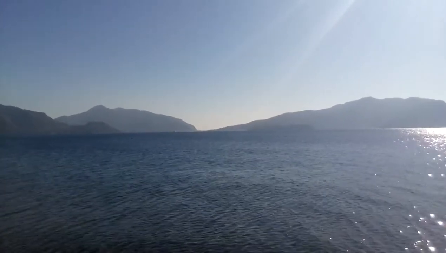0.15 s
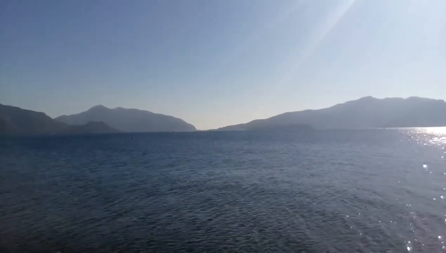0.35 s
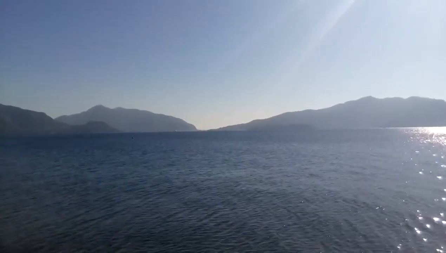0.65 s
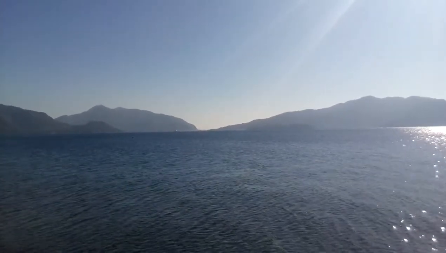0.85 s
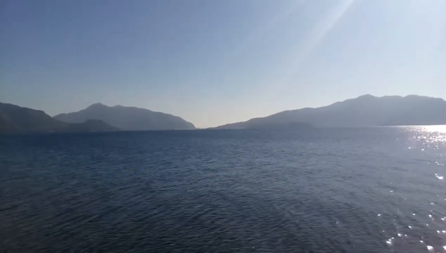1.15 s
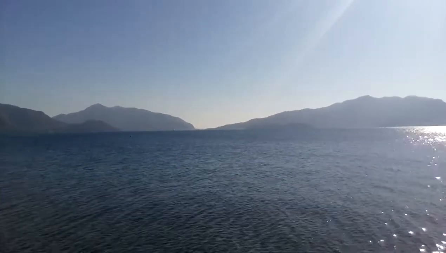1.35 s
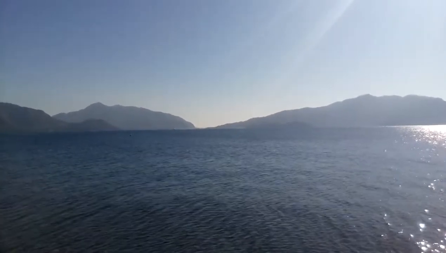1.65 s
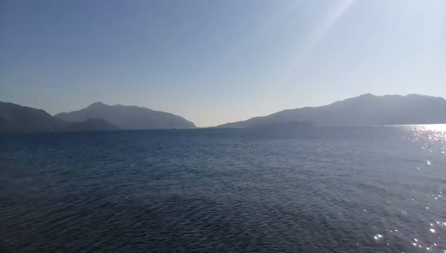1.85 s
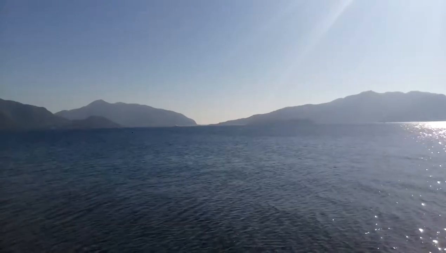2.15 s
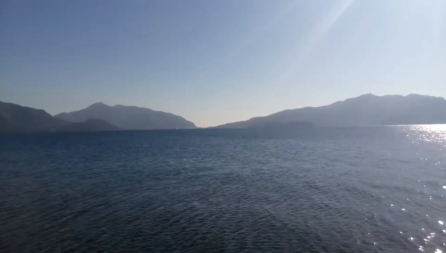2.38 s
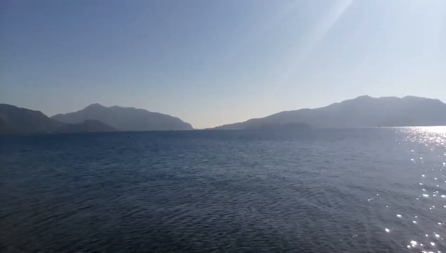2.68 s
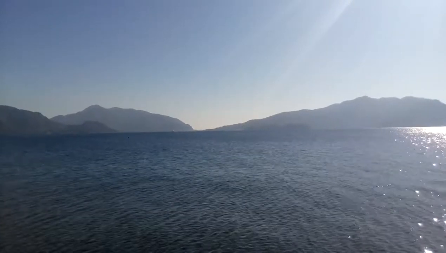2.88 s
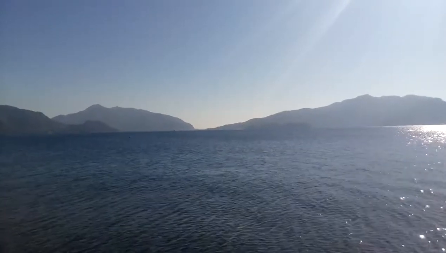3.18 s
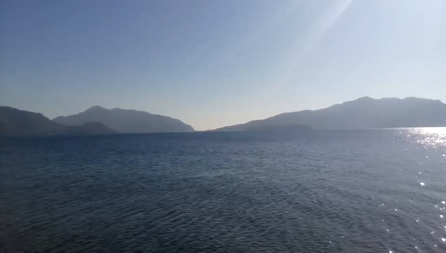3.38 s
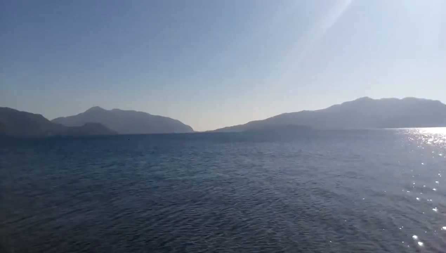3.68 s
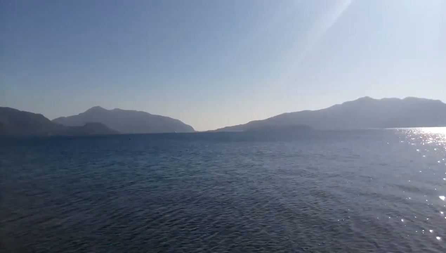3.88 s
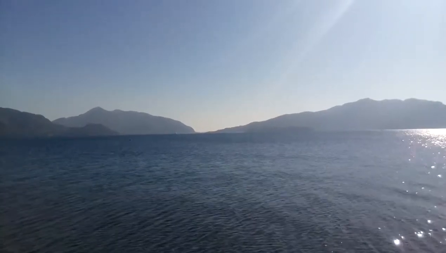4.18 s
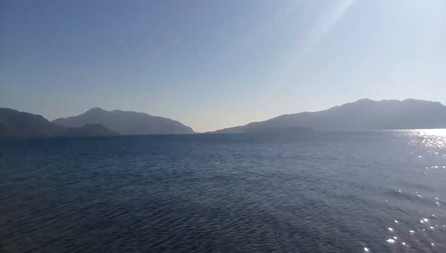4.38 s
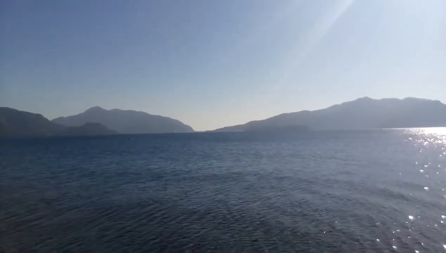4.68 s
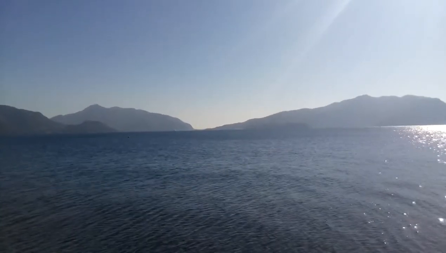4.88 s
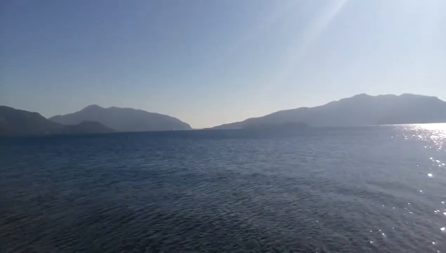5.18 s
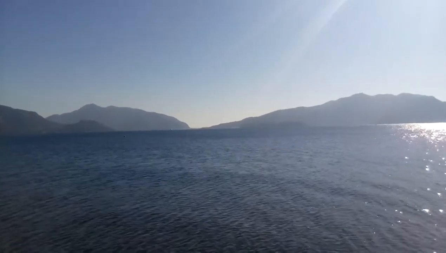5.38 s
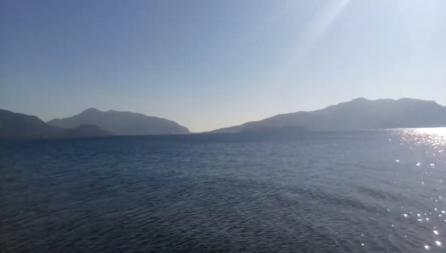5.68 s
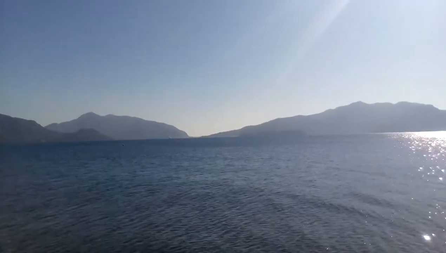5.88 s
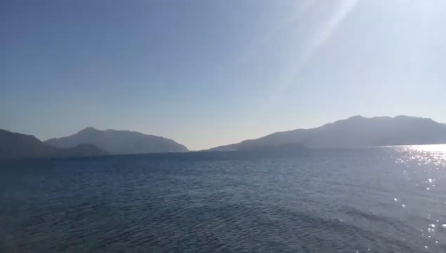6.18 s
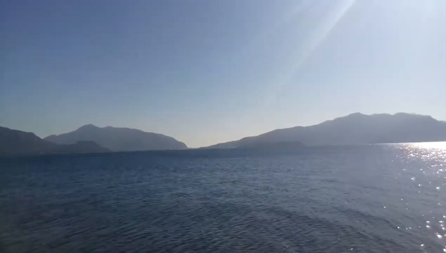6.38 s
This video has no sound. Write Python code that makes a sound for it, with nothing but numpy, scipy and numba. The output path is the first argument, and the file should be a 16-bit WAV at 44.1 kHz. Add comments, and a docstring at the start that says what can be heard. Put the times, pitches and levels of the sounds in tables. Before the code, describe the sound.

Gentle water swells twice with bubbling and drips over faint breeze thumps, before hard handling clicks break in close at the end.

```python
"""Small waves lap a pebbly shore in a calm bay: swarms of ringing air bubbles over filtered-noise washes.
Far water and a light breeze sound from the start; eddies thump the microphone as short rounded pulses.
Drops, lone bubbles and gargles join as decaying sines; two small waves swell near 2 s and again after 4 s.
Faint gliding sines chirp near 4 s and after 5.9 s. From 5.8 s the hand-held recorder is gripped anew:
its case clicks sharply as struck damped modes, and a finger rubs across it as shaped noise."""
import sys
import numpy as np
from scipy import signal
from scipy.fft import rfft, irfft, next_fast_len
from scipy.io import wavfile
from scipy.ndimage import uniform_filter1d
from numba import njit

SR = 44100
rng = np.random.default_rng(int(sys.argv[2]) if len(sys.argv) > 2 else 0)


def master_out(mix):
    """Clip the mix to full scale and print it as 16-bit PCM to the path in sys.argv[1]."""
    frames = np.transpose(np.atleast_2d(mix))
    ceiling = np.clip(frames, -1, 1)
    pcm = np.round(ceiling * 32767).astype(np.int16)
    wavfile.write(sys.argv[1], SR, pcm)


N = 288281

# times at which the slow controls are computed
STEPS_S = np.arange(0, N / SR + .004, .004)

# spectral density of breaking water: frequency_hz, density_db
WATER_SPECTRUM = [(250, -15.5), (420, -2), (560, -4), (800, -4), (1130, -1.5), (1500, -5.5), (2000, -7.5),
                  (3000, -12), (4100, -14), (5000, -16), (5750, -17), (6800, -23.5), (8200, -35),
                  (11500, -41.5), (15500, -79)]
# laps, where a stretch of a wave tips over on the shore: crest_s, level_db, swell_s, ebb_s,
# deep_air_pockets_db, big_bubbles_db, small_bubbles_db (weights added to the level),
# bounce_strength (0-1), bounce_extra_path_m (at the crest)
LAPS = [(0.14, -67.5, 0.084, 0.65, -9, -9, -2.5, 0.08, 0.3),
        (0.86, -62.5, 0.3, 0.55, 11, 3, 1.5, 0.44, 0.45), (1.05, -56, 0.22, 0.26, -4, -0.5, -3, 0.1, 0.44),
        (1.3, -53.5, 0.55, 0.45, -16, -5, 0.5, 0.18, 0.45), (1.5, -51, 0.26, 0.52, -1.5, 7, -1, 0.27, 0.44),
        (1.73, -48.5, 0.21, 0.66, 3, 6.5, -2.5, 0.36, 0.41),
        (1.92, -52.5, 0.055, 0.044, 7, 13.5, 3.5, 0.25, 0.37),
        (2.1, -39.5, 0.41, 0.39, 2, 2.5, -4.5, 0.12, 0.33), (2.29, -43.5, 0.24, 0.18, 0, -3.5, -11, 0, 0.3),
        (2.49, -51, 0.23, 0.29, -16, -5.5, -6.5, 0.13, 0.36),
        (2.84, -58, 0.29, 0.43, -3, -4.5, -6, 0.35, 0.34), (3.332, -64, 0.18, 0.13, -5, -11, 0, 0.1, 0.44),
        (3.65, -57.5, 0.25, 0.18, 2, -5, -1.5, 0.22, 0.25),
        (3.78, -58.5, 0.11, 0.25, -4, -0.5, -1, 0.25, 0.49),
        (4.01, -66.5, 0.15, 0.46, -7, -9, 1.5, 0.16, 0.41),
        (4.171, -57.5, 0.028, 0.05, -19, -15, -4, 0.25, 0.44),
        (4.325, -86, 0.021, 0.06, -7, 11, 2, 0.4, 0.38),
        (4.367, -46, 0.02, 0.041, -15, -18, -3.5, 0.5, 0.437),
        (4.53, -47.5, 0.3, 0.29, 4, 3, 1.5, 0.44, 0.43), (4.82, -54, 0.58, 0.33, -3, 1.5, -5.5, 0.33, 0.37),
        (4.825, -56.5, 0.06, 0.083, 20, 10.5, -12, 0.45, 0.37),
        (4.98, -50, 0.42, 0.36, 5.5, 7.5, -7, 0.2, 0.36),
        (5.08, -55.5, 0.041, 0.069, 19.5, 14.5, -9, 0.2, 0.33),
        (5.17, -51.5, 0.13, 0.3, -2, 2, -18, 0.4, 0.33), (5.29, -53, 0.14, 0.52, -3, -5, -7, 0.18, 0.32),
        (5.44, -60.5, 0.072, 0.056, 8, 10.5, -9, 0.3, 0.35)]
# level lost one swell before or one ebb after a crest, and the power law of that loss
LAP_FALL_DB, CREST_ROUNDNESS = 20, 1.41
RIPPLE_DB = -73.5   # ripples between the laps, before the offset of each bubble size
# flicks of fine spray thrown off a crest: crest_s, level_db
SPRAY_FLICKS = [(1.095, -71), (1.215, -74), (1.45, -67), (1.7, -61), (2.005, -50), (2.12, -54.5),
                (4.2, -68), (4.354, -57)]
FLICK_RISE_S, FLICK_FALL_S = 0.015, 0.042
CROWDED_SHARE = 0.73   # near this share of the highest crest, bubbles merge into a smooth rush
CLOSING_M_PER_S = 0.029   # the path of the bounce shrinks as a lap runs in
# resonant peaks and dips of the shore and of the hand round the recorder: centre_hz, gain_db
SHORE_BANDS = [(1170, 1), (1430, -3.5), (1790, 1), (2170, -1), (2760, 1.5), (3050, -1.5), (3690, -1.5),
               (4040, 0.5), (4540, -2), (5170, 0.5), (5400, -2), (5720, 2.5), (6220, -3), (6800, 1)]
SHORE_WIDTH_HZ = 185
# spectral density of far water all round the bay: frequency_hz, density_db
BAY_SPECTRUM = [(150, -46), (250, -10.5), (458, -2), (1010, -3.5), (1360, -7), (1560, -7), (2240, -12.5),
                (5600, -13.5), (6770, -24), (15500, -36)]
BAY_DB = -65
# spectral density of the breeze rumble: frequency_hz, density_db
BREEZE_SPECTRUM = [(12, -43), (20, 0), (27, -7.5), (78, 4.5), (96, 6.5), (150, -2.5), (184, -3), (222, -6),
                   (400, -14.5), (520, -52), (880, -120)]
BREEZE_FLOOR_DB = -73
# gusts of the breeze on the microphone: crest_s, level_db, swell_s, ebb_s
GUSTS = [(.035, -45, 0.13, 0.095), (.42, -57, 0.87, 0.27), (.645, -45.5, 0.11, 0.14),
         (.8, -41.5, 0.14, 0.19), (.96, -43.5, 0.13, 0.12), (1.13, -52.5, 0.089, .13),
         (1.55, -53, 0.35, 0.83), (2.0, -55.5, 0.85, 2.5), (3.4, -62, 0.98, 1.2), (4.38, -53.5, 0.49, 0.2),
         (4.83, -58, 0.22, 0.1), (5.45, -54, 0.47, 1.14), (6.199, -56.5, 0.58, 0.69)]
# single eddies that bump the microphone: centre_s, level_db, pitch_hz
EDDIES = [(.02, -33, 110), (.061, -33.5, 100), (.314, -43.5, 115), (0.406, -43.5, 120), (.441, -41, 120),
          (.641, -35.5, 117), (.75, -32, 90), (.776, -37, 290), (.792, -26.5, 205), (.805, -29, 147.6),
          (0.82, -37, 250), (.835, -36.5, 254), (.84, -26.5, 94), (.947, -31, 191), (.97, -30, 171),
          (.983, -28, 220), (1.125, -36.5, 153), (1.499, -41.5, 112), (1.754, -37.5, 172),
          (2.005, -40, 116), (2.043, -36, 221), (3.492, -38.5, 130), (3.598, -38.5, 162),
          (3.819, -43.5, 161), (5.449, -36.5, 161), (5.647, -40, 133), (6.236, -41, 109.2),
          (6.409, -42.5, 109)]
EDDY_RISE_CYCLES, EDDY_FALL_CYCLES = 0.38, 0.83
# drops that smack onto water or stone: start_s, pitch_hz, level_db
DROPS = [(.102, 2800, -49.5), (.128, 2550, -53.5), (.205, 3550, -47), (1.131, 5770, -41),
         (1.176, 4700, -37.5), (1.29, 3790, -42), (1.338, 2641, -41), (1.37, 6570, -39), (1.503, 4560, -30),
         (1.627, 2239, -36), (1.783, 4470, -33), (1.907, 4938, -39), (2.002, 5230, -33),
         (2.031, 5680, -28.5), (2.055, 5340, -34), (2.16, 5111, -37), (3.79, 5570, -43), (4.331, 2270, -39),
         (4.36, 4077, -34), (4.363, 2330, -33), (4.366, 2980, -37), (4.458, 3330, -35), (4.757, 1838, -39),
         (4.798, 2756, -38), (4.862, 2527, -38), (5.148, 2067, -37), (5.305, 3388, -45)]
DROP_T60_S = 0.013
# droplets land within this time, start this much weaker and lie within this interval of the drop
SPATTER_S, SPATTER_DB, SPATTER_OCTAVES = .012, -3.5, .22
# single near bubbles, plus one brief sharp tick at 4.204 s: start_s, pitch_hz, level_db, t60_s
PLOPS = [(.107, 3650, -53, .04), (.913, 1450, -38, 0.053), (1.047, 3020, -45, .02),
         (1.258, 2350, -36, 0.022), (1.281, 2290, -34, .014), (1.402, 1444, -36.5, 0.041),
         (1.625, 725, -32.5, 0.061), (1.661, 970, -28, .031), (1.699, 674, -30.5, 0.067),
         (1.726, 1030, -34, 0.042), (1.752, 940, -27, .04), (1.776, 1040, -30, .03), (1.792, 970, -29, .02),
         (1.821, 1020, -30, .02), (1.856, 1050, -33, 0.016), (1.871, 870, -28, .05),
         (1.885, 351, -36.5, 0.068), (1.95, 1025, -29, .025), (2.112, 1170, -29, 0.033),
         (2.16, 1000, -27, 0.027), (2.519, 1100, -43, .04), (2.687, 1635, -41, 0.06),
         (2.78, 280, -44, 0.063), (3.6, 1378, -43.5, .04), (3.679, 1470, -45, .06), (3.738, 1430, -45, .06),
         (4.164, 1450, -46.5, .06), (4.204, 5540, -32.5, .002), (4.271, 4130, -41.5, .023),
         (4.289, 4080, -42, .04), (4.308, 764, -47.5, .082), (4.328, 830, -45, 0.055),
         (4.348, 1650, -37.5, .04), (4.483, 786, -33, 0.048), (4.547, 1016, -28.5, 0.038),
         (4.584, 405, -36.5, 0.099), (4.64, 1115, -34, .043), (4.661, 316, -43.5, .11),
         (4.703, 994, -34.5, .03), (4.729, 1215, -32, .036), (4.822, 898, -34, .043),
         (4.883, 343, -33.5, 0.075), (4.906, 1100, -36, .03), (4.965, 675, -33, 0.044),
         (5.117, 1091, -34, .03), (5.213, 880, -36.5, 0.048), (5.346, 241, -38.5, 0.13)]
# gargles, where a small lap churns up bubbles of nearly one size:
# crest_s, level_db, swell_s, ebb_s, pitch_hz
GARGLES = [(.8, -60.5, 0.23, 0.21, 1520), (.88, -56, 0.062, 0.072, 3850), (2.87, -63, 0.13, 0.089, 1170),
           (3.63, -54.5, 0.074, .14, 1410), (3.75, -56, 0.12, .22, 1520), (3.72, -61, 0.17, .12, 2480),
           (3.73, -59.5, 0.11, 0.11, 5030), (3.79, -67, 0.16, 0.13, 5500), (4.8, -57.5, 0.21, .26, 4100),
           (4.92, -55, .16, .3, 1910), (5.05, -62, .07, .08, 6750), (5.2, -59, 0.035, .05, 4480),
           (5.305, -55.5, 0.029, 0.032, 3900), (5.62, -58.5, 0.076, .1, 1200)]
# faint thin chirps: start_s, length_s, first_pitch_hz, last_pitch_hz, level_db (before a 2 dB lift)
CHIRPS = [(3.908, 0.21, 5790, 5700, -63), (4, 0.017, 3200, 3260, -55), (4.02, 0.068, 3270, 3150, -60.5),
          (5.91, 0.019, 3020, 2950, -56.5), (6.471, 0.054, 3430, 3660, -61),
          (6.497, 0.043, 3450, 3100, -63)]
# clicks of the case: start_s, strength_db, deep_thump_db, knock_db, thud_db, high_snap_db, top_tick_db
# (the last five are weights of the registers)
CLICKS = [(5.825, -12.5, 12, -18, -2, -16, 4), (5.8283, -2.5, 9, -17, -13, -6, 2),
          (5.8358, -5, 11.5, -15, -4, -5, 6), (5.839, -11, -0.5, -15, -15, -21, 1.5),
          (5.8427, -6, 9, 12, 14, 13.5, 6), (5.8552, -29.5, 12, 23, 7, -2, -20),
          (5.865, -25.5, 4, 12, 8, 9, -20), (5.881, -28, 8, 10, 12, 3, -20),
          (5.898, -33, 6, 10, 12, 0, -20), (5.915, -38, 10, 24, 10, -4, -20),
          (6.0128, -25.5, -7, 35.5, 18, -14, -8), (6.0147, 0.5, -22, 3, 6, 3.5, -16),
          (6.0838, -9.5, -15, -16, -16, -4, -16), (6.151, -25, -9, -1, 16, -11, -14)]
# modes of the case: frequency_hz, level_db, t60_s
CASE_MODES = [(325, -22.5, 0.029), (592, -20.5, 0.016), (1160, -21, 0.0099), (1470, -11.5, 0.005),
              (3380, -3, 0.0021), (5560, -7.5, 0.0017), (10400, -11, 0.00036), (13900, -14, 0.00091)]
# borders between the registers of the case: frequency_hz
REGISTER_EDGES_HZ = [400, 800, 2200, 4500, 8000]
# spectral density of the rubbing hiss: frequency_hz, density_db
RUB_SPECTRUM = [(150, -31), (380, -20), (580, -0.5), (950, -3), (1600, 3), (2000, -3.5), (2450, -13.5),
                (3400, -5), (4800, -9), (5650, -6.5), (7200, -12), (8300, -27.5), (11300, -22),
                (12300, -30), (15500, -38)]
# strokes of the finger on the case: start_s, level_db, hold_s, length_s,
# easing_db_per_s (after the hold), rumble_weight_db
STROKES = [(5.828, -37, 0.0091, 0.0086, 303, -13), (5.844, -31, 0.0031, 0.0061, 1203, -0.5),
           (5.866, -37.5, 0.0031, .07, 292, -1), (6.017, -26.5, 0.066, 0.16, 129, -34),
           (6.173, -48.5, 0.0057, 0.006, 196, 3), (6.289, -61.5, 0.061, 0.081, 193.5, -3)]
STROKE_ATTACK_S, STROKE_RELEASE_S = 0.0041, 0.0094   # time constants of the touch and the lift
CUTOFF_HZ = 15600


def from_db(db):
    """Logarithmic level: decibels to amplitude gain."""
    return 10 ** (np.asarray(db) / 20)


def rms_one(x):
    """Normalisation to unit effective amplitude."""
    return x / np.sqrt(np.mean(x ** 2) + 1e-20)


def in_time(slow):
    """Linear interpolation of a slow control from STEPS_S to every sample."""
    return np.interp(np.arange(N) / SR, STEPS_S, slow)


def at_hz(points, hz):
    """Interpolation of a spectrum in decibels on a log-frequency axis."""
    point_hz, db = np.transpose(points)
    return np.interp(np.log(np.maximum(hz, 1)), np.log(point_hz), db)


def band(x, low_hz, high_hz, order=3):
    """Butterworth band-pass filtering."""
    edges_hz = [low_hz, min(high_hz, .45 * SR)]
    return signal.sosfilt(signal.butter(order, edges_hz, "band", fs=SR, output="sos"), x + 1e-18)


def drift(rate_hz):
    """Low-pass random fluctuation: white noise through a double pole, at unit rms."""
    step = 40       # samples between slow values
    warm_up = 2000  # slow values dropped while the filter settles
    pole = np.exp(-2 * np.pi * rate_hz * step / SR)
    white = rng.standard_normal(N // step + warm_up + 2)
    slow = signal.lfilter([1], [1, -2 * pole, pole * pole], white)[warm_up:]
    return np.interp(np.arange(N) / step, np.arange(len(slow)), rms_one(slow))


def noise(spectrum):
    """Spectral shaping: white noise weighted in the frequency domain, at unit rms."""
    size = next_fast_len(N)
    hz = np.arange(size // 2 + 1) * SR / size
    shaped = rfft(rng.standard_normal(size)) * from_db(at_hz(spectrum, hz))
    return rms_one(irfft(shaped, size)[:N])


def even(x, span_s):
    """Envelope normalisation: slow power is levelled while grain faster than span_s remains."""
    span = int(span_s * SR)
    power = uniform_filter1d(uniform_filter1d(x ** 2, span), span)
    return x / np.sqrt(np.maximum(power, 0) + 1e-4 * np.mean(x ** 2))


@njit
def rings(start_s, hz, height, t60, rise, size, sr):
    """Damped oscillation: summed dying sines, each climbing by the share `rise` while it rings."""
    out = np.zeros(size)
    for k in range(len(hz)):
        first = max(int(start_s[k] * sr), 0)
        length = int(t60[k] * sr) + 1
        level = height[k]
        fade = 1e-3 ** (1 / length)   # 60 dB over the ring
        for i in range(min(length, size - first)):
            climb = 1 + rise * i / (2 * length)
            out[first + i] += level * np.sin(2 * np.pi * hz[k] * i / sr * climb)
            level *= fade
    return out


def swell(crest_s, rise_s, fall_s):
    """Asymmetric envelope: gain builds to 1 at a rounded crest and dies away."""
    late = STEPS_S - crest_s
    away = np.minimum(np.maximum(-late / rise_s, late / fall_s), 10)
    return from_db(-LAP_FALL_DB * away ** CREST_ROUNDNESS)


def surf(offset_db, span, deep=0., big=0., small=0.):
    """Power addition of overlapping laps for one bubble size; `span` scales their duration."""
    power = from_db(RIPPLE_DB) ** 2
    for crest_s, db, swell_s, ebb_s, deep_db, big_db, small_db, *_ in LAPS:
        size_db = deep * deep_db + big * big_db + small * small_db
        power = power + (from_db(db + size_db) * swell(crest_s, span * swell_s, span * ebb_s)) ** 2
    return from_db(offset_db) * in_time(np.sqrt(power))


def swarm(level, low_hz, high_hz, count, cycles, spread_db, wash_db, clump_db):
    """Superposed bubble resonances: random rings of one size class over a wash; at crests they merge."""
    when, pitch, size, life = rng.random((count, 4)).T
    hz = low_hz * (high_hz / low_hz) ** pitch
    strength_db = spread_db * np.minimum(-np.log(1 - size), 4)
    # short high rings need more height
    height = hz / high_hz * from_db(at_hz(WATER_SPECTRUM, hz) + strength_db)
    t60_s = cycles * 2 ** (2 * life - 1) / hz
    bubbles = rings(when * N / SR, hz, height, t60_s, 0.042, N, SR)
    bubbles = rms_one(band(bubbles, low_hz * 1.043, high_hz * 1.06))
    # bubbles too small to tell apart
    wash = from_db(wash_db) * rms_one(band(noise(WATER_SPECTRUM), low_hz, high_hz, order=4))
    apart = 1 / np.sqrt(1 + (level / level.max() / CROWDED_SHARE) ** 4)
    clumps = from_db(apart * clump_db * drift(22.4))
    return level * even((apart * bubbles + wash) * clumps, 0.052)


def waves():
    """Bubble resonance by size: air pockets gulp and glug, bubbles gurgle, splash and fizz, fines spray."""
    flicks = in_time(sum(from_db(db) * swell(s, FLICK_RISE_S, FLICK_FALL_S) for s, db in SPRAY_FLICKS))
    gulp = swarm(surf(offset_db=-10.5, span=0.74, deep=0.45), 243, 415.0,
                 count=450, cycles=20, spread_db=4.0, wash_db=2, clump_db=0.5)
    glug = swarm(surf(offset_db=-8.0, span=0.81, deep=0.93), 405, 646,
                 count=700, cycles=49, spread_db=6.0, wash_db=-7.0, clump_db=0.5)
    gurgle = swarm(surf(offset_db=0, span=0.9, big=0.96), 624.0, 1307,
                   count=1900, cycles=33, spread_db=3.0, wash_db=-4.5, clump_db=1.4)
    splash = swarm(surf(offset_db=0.5, span=1.0), 1242, 3066,
                   count=6000, cycles=51, spread_db=3.0, wash_db=-4.2, clump_db=1.33)
    fizz = swarm(surf(offset_db=0.5, span=1.097, small=1), 3020, 7370,
                 count=11000, cycles=64, spread_db=4.0, wash_db=-2.5, clump_db=1.4)
    spray = swarm(surf(offset_db=-17.0, span=0.75, small=1.55) + flicks, 7160, 16300,
                  count=6000, cycles=88, spread_db=4.0, wash_db=1.5, clump_db=2.0)
    slosh = from_db(0.36 * drift(14.0))   # each little collapse stirs all sizes at once
    return (gulp + glug + gurgle + splash + fizz + spray) * slosh


def delayed(x, path_m):
    """Propagation delay over a further stretch of air at 343 m/s."""
    now = np.arange(N)
    return np.interp(now - path_m / 343 * SR, now, x)


def bounced(x, holder_path_m=0.398, holder_share=0.04, scatter_hz=9500):
    """Comb interference: echoes off the water and off whoever holds the recorder overlap the direct sound."""
    # fourth powers let the loudest lap set the bounce
    weights = [(from_db(db) * swell(s, swell_s, ebb_s)) ** 4 + 1e-40
               for s, db, swell_s, ebb_s, *_ in LAPS]
    weights = weights / np.sum(weights, axis=0)
    share = in_time(sum(w * strength for w, (*_, strength, _) in zip(weights, LAPS)))
    path_m = in_time(sum(w * (m - CLOSING_M_PER_S * (STEPS_S - s))
                         for w, (s, *_, m) in zip(weights, LAPS)))
    # ripples scatter the treble
    scatter = signal.butter(1, min(scatter_hz, .45 * SR), fs=SR, output="sos")
    water = signal.sosfiltfilt(scatter, delayed(x, path_m))
    holder = delayed(x, holder_path_m)
    return (x + share * water + holder_share * holder) / np.sqrt(1 + .5 * share ** 2)


def shore_colour(x):
    """Resonance and antiresonance: a chain of narrow peaks and dips layers the wash into hollow bands."""
    half = np.pi * SHORE_WIDTH_HZ / SR
    for hz, db in SHORE_BANDS:
        lift = from_db(db / 2)
        turn = -2 * np.cos(2 * np.pi * hz / SR)
        zeros = [1 + half * lift, turn, 1 - half * lift]
        poles = [1 + half / lift, turn, 1 - half / lift]
        x = signal.lfilter(zeros, poles, x)
    return x


def far_bay():
    """Diffuse summation: far water forms a steady coloured noise with a slight drift in level."""
    return from_db(BAY_DB) * noise(BAY_SPECTRUM) * from_db(.5 * drift(4.75))


def breeze():
    """Turbulent pressure: lumpy low noise at the microphone port swells with each gust."""
    power = sum((from_db(db) * swell(s, swell_s, ebb_s)) ** 2 for s, db, swell_s, ebb_s in GUSTS)
    lumps = from_db(3.7 * drift(22))
    rumble = even(band(noise(BREEZE_SPECTRUM), 42, 387, order=2) * lumps, 0.06)
    return rumble * in_time(np.sqrt(power + from_db(BREEZE_FLOOR_DB) ** 2))


def eddies():
    """Pressure pulse of an eddy: a rounded push of a cycle or two that builds faster than it dies."""
    margin = SR // 10
    out = np.zeros(N + SR)
    age = np.arange(-margin, margin) / SR
    for centre_s, db, hz in EDDIES:
        turns = age * hz
        away = np.maximum(-turns / EDDY_RISE_CYCLES, turns / EDDY_FALL_CYCLES)
        push = np.exp(-away ** 2) * np.sin(2 * np.pi * turns)
        first = int(centre_s * SR)
        out[first:first + len(age)] += from_db(db) * push
    return out[margin:margin + N]


def drops(count=5):
    """Impact resonance: each drop rings briefly and a spatter of droplets broadens it into a wet tick."""
    s, hz, db = np.array(DROPS, float).T.copy()
    late, detune = rng.random((len(s), 2, count)).transpose(1, 0, 2)
    spatter_s = (s[:, None] + SPATTER_S * late).ravel()
    spatter_hz = (hz[:, None] * 2 ** (SPATTER_OCTAVES * (2 * detune - 1))).ravel()
    spatter = (from_db(db[:, None] + SPATTER_DB) * (1 - .5 * late)).ravel()
    spatter_t60_s = np.full(spatter.size, DROP_T60_S / 2)
    out = rings(s, hz, from_db(db), np.full(len(s), DROP_T60_S), .03, N, SR)
    out = out + rings(spatter_s, spatter_hz, spatter, spatter_t60_s, .03, N, SR)
    return band(out, 900, 10000, order=2)


def plops():
    """Resonance of a lone bubble: its pitch rises as it reaches the surface."""
    s, hz, db, t60_s = np.array(PLOPS).T.copy()
    return band(rings(s, hz, from_db(db), t60_s, 0.032, N, SR), 290, 11400)


def gargles(bubbles_per_s=500, cycles=38, pitch_spread=0.068):
    """Near-equal resonances: like bubbles churned between the pebbles make a narrow, hollow band."""
    out = 0
    for s, db, swell_s, ebb_s, centre_hz in GARGLES:
        length_s = swell_s + ebb_s
        when, pitch, size = rng.random((int(bubbles_per_s * length_s), 3)).T
        born_s = s - swell_s + when * length_s
        hz = centre_hz * (1 + pitch_spread * (2 * pitch - 1))
        # more overlapping rings need less height each
        overlap = bubbles_per_s * cycles / hz / (4 * np.log(1000))
        envelope = np.interp(born_s, STEPS_S, swell(s, swell_s, ebb_s))
        height = from_db(db) * 2 * size / np.sqrt(overlap) * envelope
        out = out + rings(born_s, hz, height, cycles / hz, 0.044, N, SR)
    return band(out, 900, 8600)


def chirps(waver=0.034):
    """Frequency modulation: each chirp swells and fades along a short glide of unsteady pitch."""
    out = np.zeros(N)
    for start_s, length_s, first_hz, last_hz, db in CHIRPS:
        progress = np.clip((np.arange(N) / SR - start_s) / length_s, 0, 1)
        hz = (first_hz + (last_hz - first_hz) * progress) * (1 + waver * drift(179))
        tone = np.sin(2 * np.pi * np.cumsum(hz) / SR)
        out += from_db(db + 2.0) * np.sin(np.pi * progress) * tone
    return out


def knocks():
    """Modal excitation: each click strikes all modes of the case, in a balance set by where it lands."""
    s, db, thump, knock, thud, snap, tick = np.array(CLICKS, float).T.copy()
    weights_db = [thump, knock, thud, 0, snap, tick]   # one per register, from low to high
    out = 0
    for hz, mode_db, t60_s in CASE_MODES:
        register = np.searchsorted(REGISTER_EDGES_HZ, hz)
        height = from_db(db + mode_db + weights_db[register])
        out = out + rings(s, np.full(len(s), float(hz)), height, np.full(len(s), t60_s), 0., N, SR)
    return band(out, 690, 13800, order=2)


def finger_db(flesh=0):
    """Contact envelope of rub or rumble: each stroke touches down, holds, eases off and lifts."""
    gain = 1e-6
    for start_s, db, hold_s, length_s, ease_db_per_s, flesh_db in STROKES:
        age = np.arange(N) / SR - start_s
        touch = np.minimum(age, 0) / STROKE_ATTACK_S
        lift = np.maximum(age - length_s, 0) / STROKE_RELEASE_S
        eased_db = ease_db_per_s * np.clip(age - hold_s, 0, 1)
        gain = gain + np.exp(touch - lift) * from_db(db + flesh * flesh_db - eased_db)
    return 20 * np.log10(gain)


def rubbing(pressed_db=-29.0, sharpening=0.67):
    """Sliding friction: the finger drags with a grainy hiss, and its pad judders in a low rumble."""
    rub_db = finger_db()
    hiss = rms_one(noise(RUB_SPECTRUM) * from_db(1.0 * drift(150)))
    top_gain = from_db(sharpening * (rub_db - pressed_db))   # a lighter touch loses its top first
    body = band(hiss, 100, 7200, order=5)
    top = band(hiss, 7430, 20000, order=5)
    judder = rms_one(band(rng.standard_normal(N), 277, 980) * from_db(3.4 * drift(110)))
    return from_db(rub_db) * (body + top_gain * top) + from_db(finger_db(flesh=0.94)) * judder


def scene():
    """Linear superposition of the shore, the far bay and what touches the microphone, in mono."""
    shore = shore_colour(bounced(waves())) + drops() + plops() + gargles()
    wind = breeze() + eddies()
    handling = knocks() + rubbing()
    return (shore + far_bay() + wind + chirps() + handling)[None]


def record(dry):
    """Saturation and low-pass filtering: the sharpest peaks are rounded and the top is cut steeply."""
    low_pass = signal.ellip(10, .1, 80, CUTOFF_HZ, fs=SR, output="sos")
    return signal.sosfilt(low_pass, np.tanh(dry))


dry = scene()
out = record(dry)
master_out(out)
```